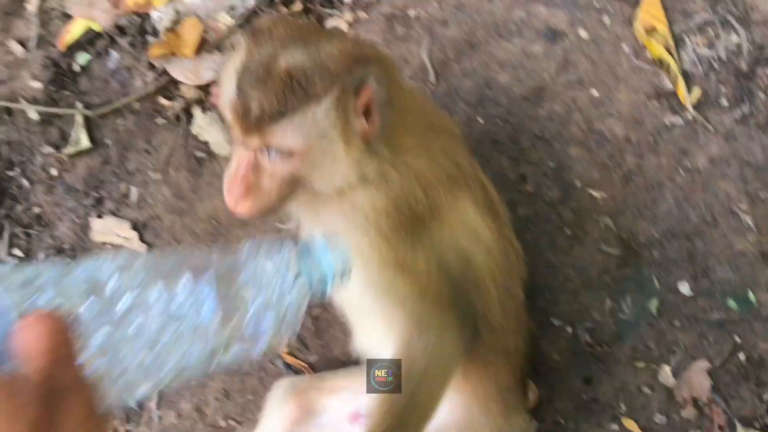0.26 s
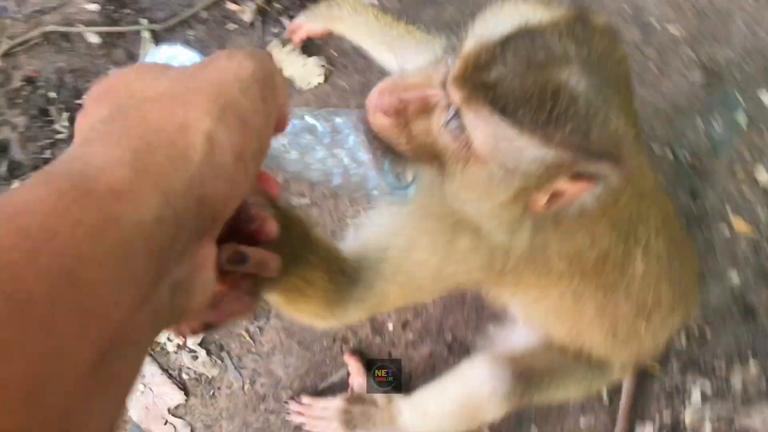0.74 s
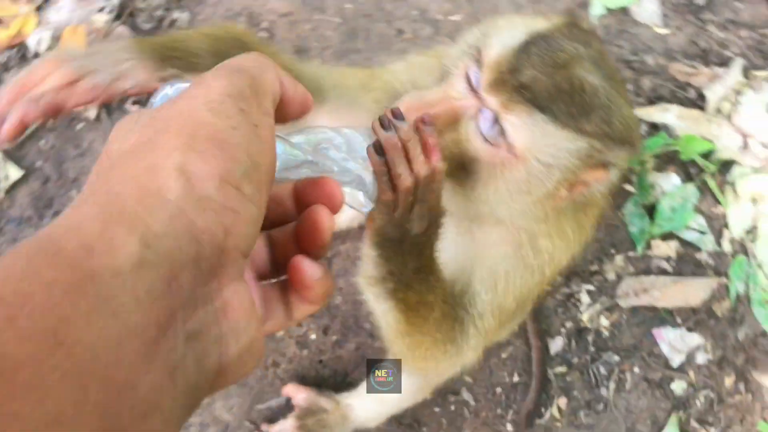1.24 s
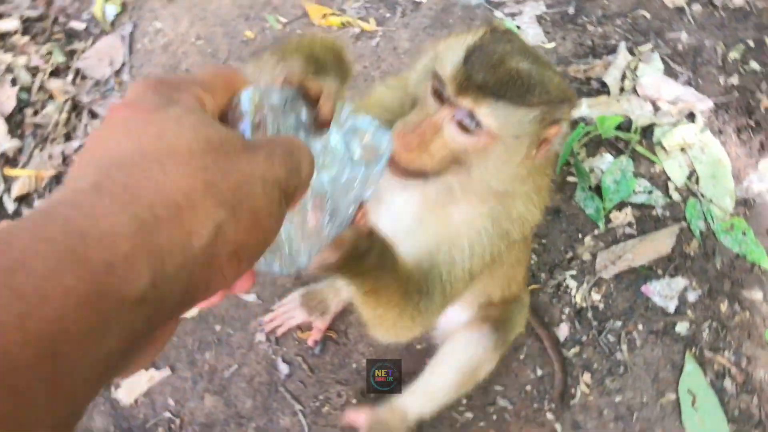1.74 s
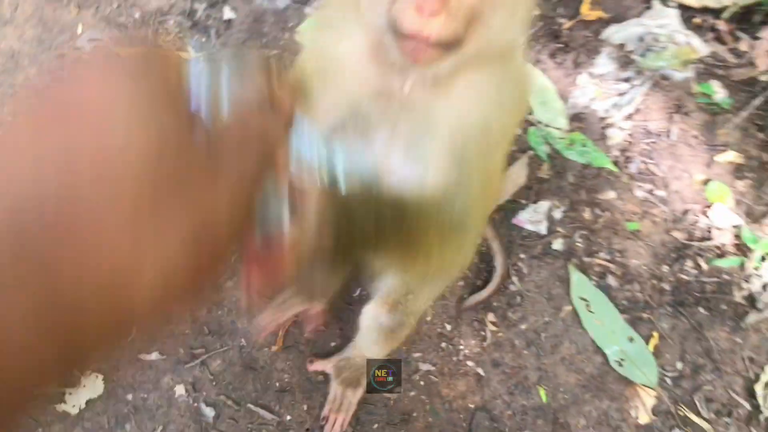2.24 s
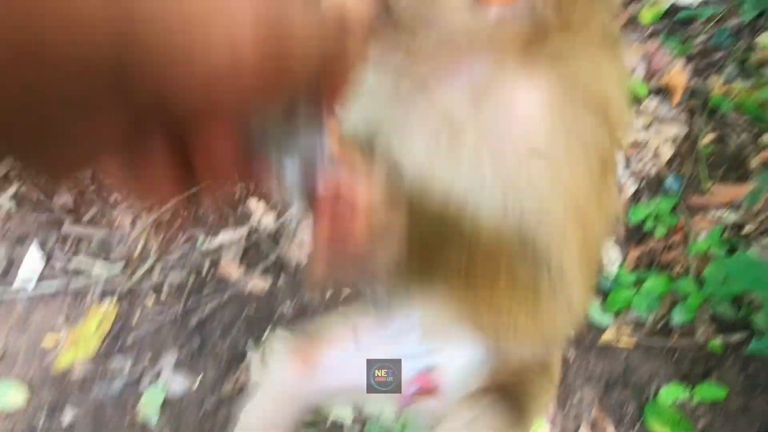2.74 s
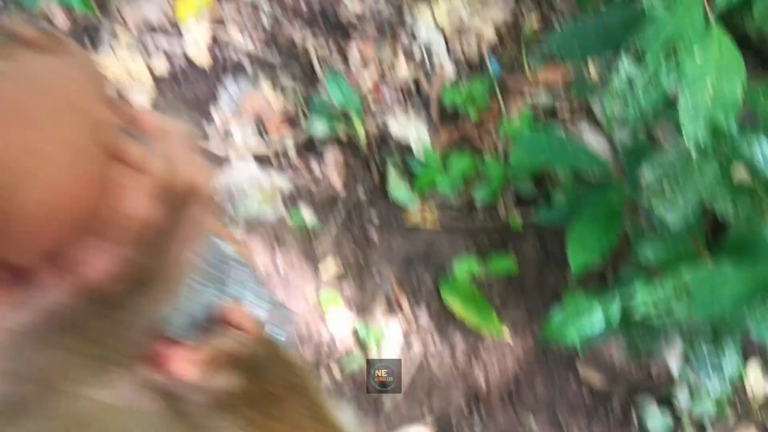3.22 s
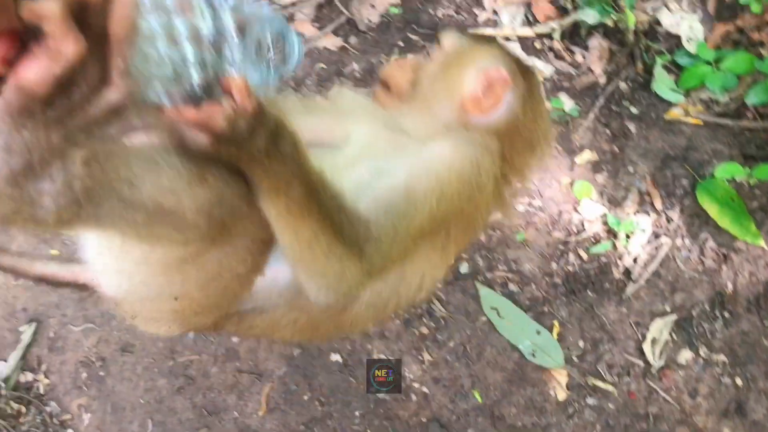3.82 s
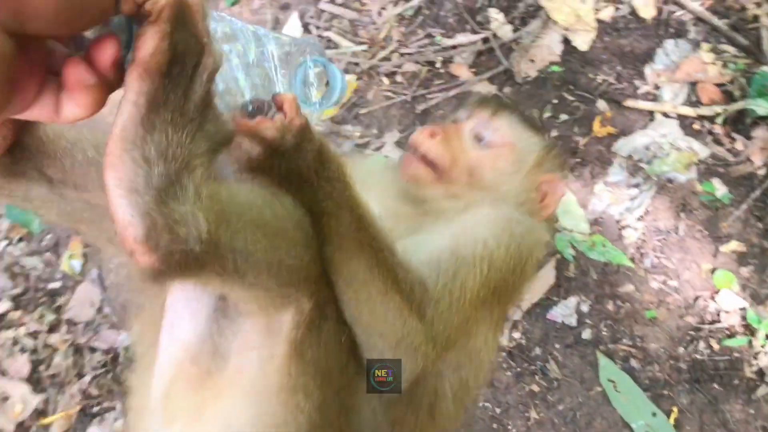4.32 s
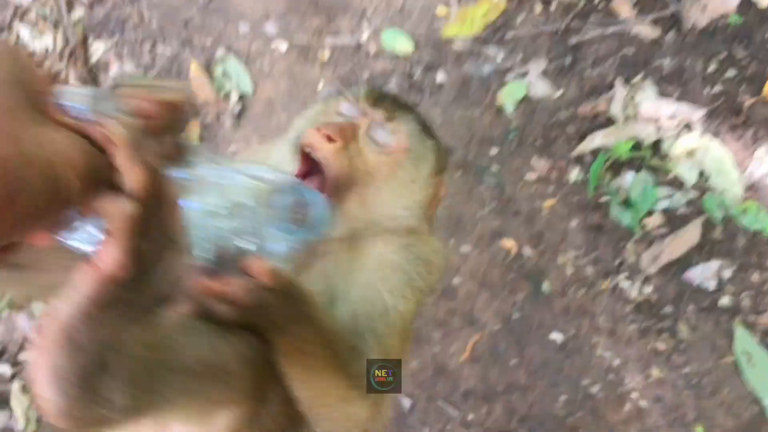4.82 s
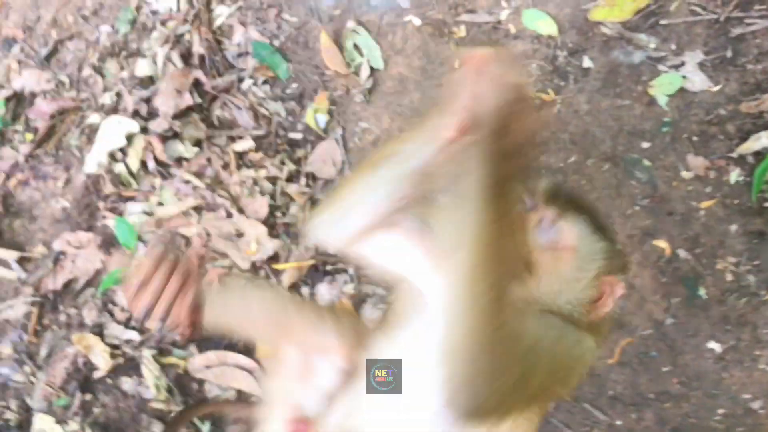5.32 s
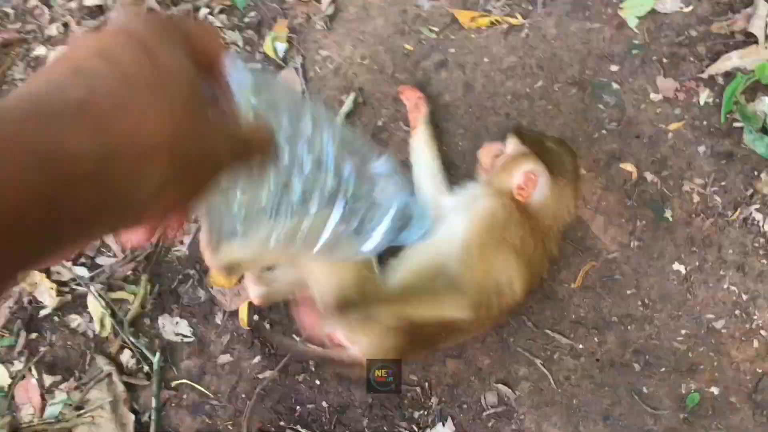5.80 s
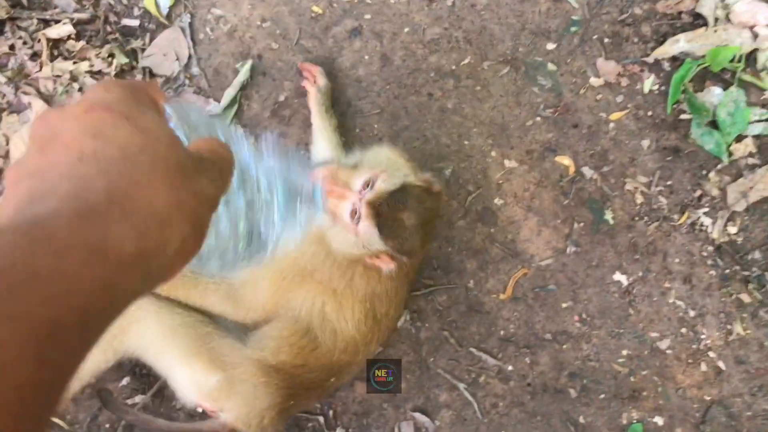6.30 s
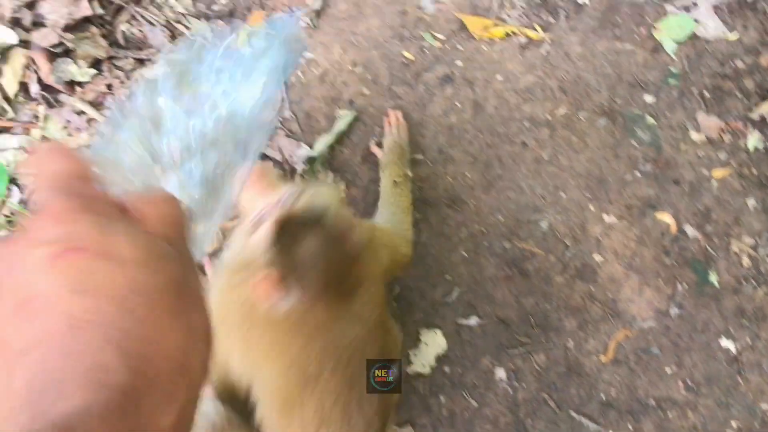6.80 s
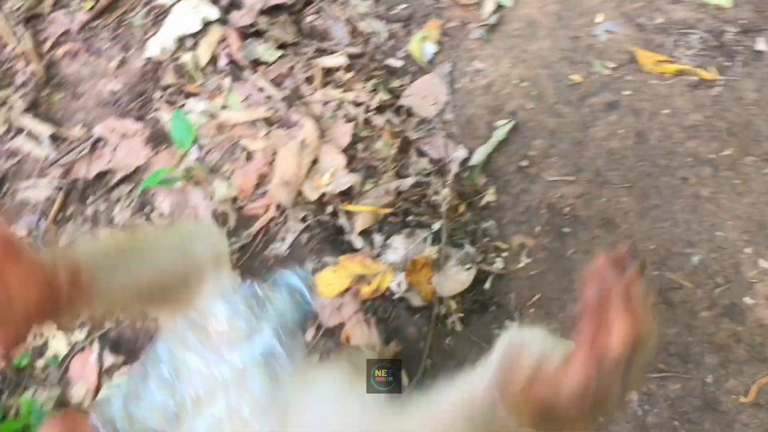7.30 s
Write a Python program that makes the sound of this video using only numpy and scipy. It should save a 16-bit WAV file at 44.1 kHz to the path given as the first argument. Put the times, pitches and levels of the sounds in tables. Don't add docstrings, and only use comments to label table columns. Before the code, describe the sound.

A young monkey grabs and tugs a thin empty plastic bottle, which crackles and snaps sharply close up over faint insects and low wind outdoors.

```python
import sys
import numpy as np
from scipy import signal
from scipy.fft import rfft, irfft, next_fast_len
from scipy.io import wavfile
from scipy.ndimage import uniform_filter1d

SR = 44100
rng = np.random.default_rng(int(sys.argv[2]) if len(sys.argv) > 2 else 0)


def magnitude_from_level(level_db):
    exponent = np.asarray(level_db, float) / 20
    return 10 ** exponent


def dump(signal):
    limited = np.clip(np.atleast_2d(signal).T, -1, 1)
    pcm = np.round(limited * 32767).astype(np.int16)
    wavfile.write(sys.argv[1], SR, pcm)


N = 332955

# time in seconds, wind in dB, insects in dB.
OUTDOORS = [(0.0, -49, -56.5), (0.82, -50, -55), (2.5, -50, -57.5), (3.28, -48.5, -57), (4.48, -48, -54.5),
            (4.94, -48.5, -57.5), (6.94, -46, -54.5), (7.55, -47, -52.5)]
# frequency in Hz, density in dB per Hz.
WIND_SPECTRUM = [(15, 8.5), (25, -14.5), (59, 5), (113, 2), (144, 1.5), (323, -17.5), (447, -29),
                 (1200, -24.5), (1560, -87), (2640, -120)]
INSECT_SPECTRUM = [(5290, -45), (9000, -7), (10300, -17), (12400, 4.5), (13400, 5), (14800, -16),
                   (15700, -25), (16500, -53)]
FAR_HISS_SPECTRUM = [(180, -37.5), (300, -47), (457, -2.5), (1420, 0.5), (8910, -13.5), (10200, -58),
                     (11000, 0.5), (14300, 1.5), (17000, -56)]
FAR_HISS_DB = -59

# time in seconds, leaf rubbing in dB, wall rubbing in dB re leaves.
RUBBING = [(0.0, -58.5, -0.5), (1.0, -58.5, -13), (1.37, -58, 3), (1.6, -52, -10), (2.04, -60.5, -5),
           (2.21, -58.5, -10), (3.2, -59, -24), (4.12, -62.5, -10.5), (4.67, -55.5, -2), (4.93, -59.5, -19),
           (5.17, -52.5, -9), (5.44, -65.5, 2), (5.55, -41, -15), (5.88, -63.5, -1.5), (6.2, -64.5, -4),
           (6.8, -58, -3), (7.28, -63.5, -13), (7.55, -48.5, -3)]
# frequency in Hz, density in dB per Hz.
WALL_SPECTRUM = [(400, -28), (800, 0), (1400, 10), (2400, 4.5), (3500, 4.5), (7000, -10.5)]
LEAF_SPECTRUM = [(1500, -0.5), (2800, 2), (4500, 4.5), (7500, 6.5), (10300, -4), (13000, 9.5), (16500, -14)]
# start and end in seconds, wall rub in dB, bright rustle in dB, resonance in Hz.
SCRAPES = [(0.282, 0.362, -66, -56, 4170), (0.362, 0.383, -53.5, -74, 2010), (0.394, 0.437, -57, -78, 1350),
           (0.528, 0.57, -53, -59, 1850), (0.74, 0.807, -58.5, -53, 6200), (1.178, 1.217, -58, -55, 2700),
           (1.227, 1.271, -54, -70, 2680), (1.343, 1.39, -52, -48, 2800), (1.735, 1.843, -43.5, -46, 6000),
           (2.143, 2.168, -39.5, -33.5, 2320), (2.406, 2.497, -61, -52.5, 2140),
           (2.531, 2.591, -56, -50, 2050), (2.624, 2.67, -58, -56, 2120), (2.737, 2.765, -50, -69, 3060),
           (2.97, 3.005, -58.5, -50.5, 1500), (4.044, 4.146, -86, -61.5, 6700),
           (4.622, 4.667, -49, -47.5, 1410), (5.317, 5.361, -47, -47.5, 2780),
           (5.496, 5.517, -48, -35.5, 2300), (5.502, 5.548, -49, -45.5, 2460),
           (7.475, 7.484, -68, -45.5, 7200), (6.637, 6.658, -49.5, -75, 1280),
           (7.304, 7.385, -59.5, -54.5, 2550), (.09, 0.243, -72, -59, 3400), (1.401, 1.484, -61, -50, 2320),
           (4.2, 4.226, -59, -70, 1790), (4.437, 4.45, -68, -55, 4200), (5.616, 5.67, -67, -65, 4200),
           (5.703, 5.792, -60, -57.5, 5940), (7.38, 7.407, -65, -51, 5030), (1.652, 1.716, -58, -48, 3000)]
SLIPS_PER_S, SLIP_DEPTH = 200, 0.5

# start in seconds, level in dB, main ring in Hz,
# hollow body in dB re level, sharpness in dB re level.
DENTS = [(0.0034, -35.5, 2250, -7.5, -23), (0.413, -43, 1390, -1.5, -28), (0.5332, -32.5, 1350, 5.5, -12),
         (0.9031, -47.5, 1370, 5, 11), (1.7022, -26, 1200, -7.5, -46), (2.0929, -31, 2530, 0, 13.5),
         (2.2161, -43.5, 770, 6.5, -14), (2.6619, -29, 940, -9, -34), (3.0668, -20, 1060, -4.5, -39),
         (3.6628, -25.5, 2140, -15, -25), (3.065, -25, 1120, -6.5, -38), (3.1257, -43, 1490, 6, 13),
         (3.4316, -31.5, 1190, -6, -11), (3.4579, -35.5, 1810, -5, 8), (3.765, -47.5, 1100, 5, -38),
         (4.1912, -35, 1020, -0.5, -14), (4.2751, -33, 1900, -17, -0.5), (4.2824, -39, 970, 3.5, -13),
         (4.9853, -29, 866, 0, -63), (4.9925, -25.5, 950, -15, -54), (5.503, -28.5, 2460, -15, 10.5),
         (6.5105, -34.5, 1200, -6, -2), (6.6444, -41, 1370, -30, -22), (6.7876, -33.5, 1250, -25, -7.5),
         (6.8753, -33.5, 1740, -11, -18), (7.073, -46, 2200, -13, 0), (7.4799, -38.5, 940, -3, -30)]
# start in seconds, level in dB, main ring in Hz,
# hollow body in dB re level, sharpness in dB re level.
CRUSH = [(5.051, -25.5, 1670, -5, -47), (5.055, -37.5, 1340, 15, 15), (5.0667, -28, 1400, -20, -30),
         (5.082, -27.5, 1580, -2, -21), (5.0921, -30.5, 1010, 9.5, 9), (5.0956, -13, 780, -26, -19),
         (5.1073, -24.5, 1580, 1, -5), (5.141, -27, 1610, -11, -12), (5.1828, -43.5, 1480, 2.5, -3),
         (5.2345, -34.5, 1330, 0, -1), (5.2394, -27.5, 1400, -7, 20.5), (5.2559, -20, 1400, -13, 8),
         (5.2613, -14, 1400, -47, -6), (5.2686, -13, 1430, 2, 3.5), (5.2848, -12.5, 1550, -19, -6),
         (5.2949, -16.5, 1610, -4, 6), (5.306, -17, 1570, -9, -38), (5.4988, -33, 4730, -4, 2),
         (5.5137, -35, 2340, -8, 5.5)]
# start in seconds, level in dB, main ring in Hz.
CRINKLES = [(0.013, -38.5, 2660), (0.1294, -44.5, 2360), (.8809, -47, 2900), (1.082, -44.5, 2970),
            (1.186, -48, 2820), (1.476, -34.5, 2580), (1.49, -38.5, 2600), (1.507, -41.5, 2470),
            (1.522, -40, 3760), (1.5345, -45, 3780), (1.5486, -39, 3670), (1.59, -38, 5600),
            (1.6097, -38.5, 5700), (1.628, -41, 2860), (1.6516, -34.5, 2670), (1.6876, -38, 3400),
            (1.7598, -35.5, 2500), (1.8287, -35.5, 2700), (2.8973, -43, 6260), (2.9782, -44, 6100),
            (4.391, -52, 1870), (5.7675, -45.5, 1660), (5.8178, -38, 5900), (6.729, -44.5, 2140),
            (7.3887, -40.5, 3600)]
# start in seconds, peak in dB, main ring in Hz.
STRAYS = [(0.0234, -30, 1410), (0.0364, -31, 1380), (0.0474, -46, 2110), (0.092, -35, 1640),
          (0.2814, -39, 4460), (0.376, -31, 1280), (0.4374, -33, 2580), (0.4686, -38, 1940),
          (0.8654, -45, 1070), (1.1189, -49, 2300), (1.1914, -31, 2520), (1.275, -30, 2130),
          (1.2999, -42, 2920), (1.3239, -32, 2450), (2.5251, -33, 1170), (3.26, -36, 1390),
          (3.2784, -44, 4340), (3.3882, -46, 1390), (3.616, -27.5, 1410), (3.6904, -28, 1460),
          (3.7074, -33, 1460), (3.7236, -31, 1350), (3.7477, -40, 1390), (3.7956, -33, 1500),
          (3.8997, -41, 1280), (3.92, -48, 1450), (4.061, -40, 1400), (4.2214, -43, 2590),
          (4.2453, -46, 1340), (4.2586, -36, 1750), (4.2964, -42, 1560), (4.346, -25.5, 2220),
          (4.496, -34, 1520), (4.8463, -32, 1690), (4.8823, -34, 4270), (5.6276, -26, 3880),
          (5.7384, -32, 1010), (6.0653, -36, 1190), (6.2166, -35, 1220), (6.4278, -40, 1390),
          (6.4982, -39, 1140), (6.5797, -33.5, 2310), (6.626, -40, 1410), (6.911, -39, 1940),
          (7.2389, -43, 2010), (7.2495, -31, 3150), (7.3058, -36, 1480), (7.3585, -29, 1320),
          (7.3922, -30, 1460), (7.419, -36, 5630), (7.444, -35, 1430), (7.5087, -31, 1150)]
# start in seconds, level in dB, main ring in Hz.
PRESSES = [(0.4252, -43, 1310), (3.018, -38, 1470), (3.049, -45, 1150), (3.1081, -30, 1070),
           (3.1961, -40, 1340), (3.6067, -37, 1030), (3.714, -40.5, 1360), (4.34, -43.5, 1480),
           (4.4794, -44, 1350), (5.8254, -40.5, 1110), (5.8947, -42, 1330), (5.947, -51, 1220),
           (5.959, -43, 1270), (6.079, -44, 1220), (6.1197, -44, 1170), (6.23, -45, 1230),
           (6.3793, -39.5, 1280), (6.261, -56, 1180), (6.6556, -35.5, 1210), (6.8017, -36, 1370),
           (6.9472, -38.5, 1260), (7.016, -47, 1400)]
# start in seconds, level in dB,
# main ring in Hz, upper middle in dB re level, sharpness in dB re level.
TIGHT_SNAPS = [(0.9287, -14.5, 2530, -1, -16), (1.894, -16.5, 1690, -5, 6.5), (2.149, -31.5, 2450, -11, 2),
               (2.2509, -32, 2210, -4, 4), (2.7961, -20.5, 1700, 1, 0.5), (2.922, -16.5, 3590, -2, 2),
               (3.0883, -37.5, 5340, 13, -1), (4.433, -24.5, 4250, -5, -6), (4.4655, -23.5, 4130, -8, -8),
               (4.707, -50, 7000, 18, 10), (4.725, -27, 1690, 1, -19)]
# start in seconds, level in dB, main ring in Hz.
WRINGING = [(1.9511, -33.5, 3970), (1.964, -35, 3220), (1.9732, -38.5, 2200), (1.9854, -39, 2110),
            (1.9926, -36.5, 2180), (2.001, -38, 4070), (2.106, -32.5, 2060), (2.131, -34, 3220),
            (2.26, -35.5, 2270), (2.2869, -37.5, 1750), (2.2956, -37, 2290), (2.309, -35.5, 2290),
            (2.3287, -38, 2420), (2.355, -36.5, 2280), (2.3696, -34, 2370), (2.3849, -34.5, 2200),
            (2.416, -36, 2240), (2.4257, -36.5, 3740), (2.445, -36, 6960), (2.4576, -37, 3400),
            (2.4764, -39.5, 1980), (2.4888, -40, 2140), (2.5107, -42, 1270), (2.5606, -42, 2210),
            (2.6235, -31.5, 3700), (2.6822, -36, 2200), (2.7299, -41.5, 3000), (2.762, -45, 2990)]
# start in seconds, level in dB, main ring in Hz,
# upper middle in dB re level, sharpness in dB re level.
SNAPS = [(2.0671, -28, 2480, -5, 6), (2.1554, -26.5, 2630, -12, 9), (2.2256, -21.5, 2060, -5, -6),
         (2.341, -17, 2070, 0, -3), (2.6637, -23, 1980, 3.5, 11.5), (3.1187, -22.5, 1670, 1, 6.5),
         (3.513, -24, 2830, 2.5, -30), (3.6667, -20.5, 1380, 1, 13), (4.5254, -9.5, 7000, -2.5, 2.5),
         (4.613, -27, 4900, 7, 7), (4.691, -17.5, 2450, -6, 3), (4.75, -24, 7150, -1.5, 12),
         (4.8058, -21.5, 1450, 7, 16), (5.1187, -14, 5500, 1.5, 6)]
# start in seconds, level in dB, main ring in Hz.
CREAKS = [(2.628, -44, 2000), (2.6308, -42, 2200), (2.6346, -40, 2100), (2.639, -41, 2000),
          (2.6457, -41, 2000), (2.653, -40, 2000), (2.6568, -44, 2000), (2.6602, -41, 2600),
          (2.6778, -45, 2400), (2.6805, -35, 3000), (2.8006, -37.5, 3000)]
CRINKLE_BODY_DB, CRINKLE_SHARP_DB = -23, 0.5
STRAY_LOSS_DB, STRAY_BODY_DB, STRAY_SHARP_DB = 14.5, -8, -7.5
PRESS_BODY_DB, PRESS_SHARP_DB = -8.5, -11
WRING_BODY_DB, WRING_SHARP_DB = -13, 2
CREAK_BODY_DB, CREAK_SHARP_DB = -20, 3
SNAP_BODY_DB, TIGHT_BODY_DB = -13.5, -22.5
SKIN_PER_SHARP, SKIN_DB_PER_OCTAVE = 0.53, -1.5
CRACK_T60_S, WALL_T60_S, BODY_T60_S = 0.011, 0.019, 0.016
RING_Q, RING_SHARE = 4.5, 0.59
GROUND_LAG_S, GROUND_DB = 0.0043, -11

# start and end in seconds, level in dB, resonance in Hz.
SCUFFS = [(.29, .35, -62, 4200), (.63, 0.743, -61, 1590), (0.944, .97, -59, 2300), (1.35, 1.39, -42, 2700),
          (5.33, 5.34, -35, 2150), (5.323, 5.36, -46, 6000), (5.984, 6.01, -58, 1600),
          (6.04, 6.06, -60, 2300), (6.105, 6.14, -58, 1300), (6.252, 6.285, -56, 1200),
          (6.39, 6.408, -54, 2200), (6.53, 6.56, -57, 1500), (6.656, 6.69, -58, 1400),
          (6.814, 6.84, -55, 1500), (6.9, 6.92, -64, 1820), (4.095, 4.13, -57, 7000),
          (3.437, 3.46, -51, 1300)]
SCUFF_Q = 5.7
# start in seconds, peak in dB, pitch in Hz.
THUMPS = [
    (0.532, -27, 142),
    (0.534, -30, 290),
    (5.054, -24, 280),
    (5.093, -25, 183),
    (4.192, -35, 310),
    (5.299, -30.5, 185),
    (5.5, -34.5, 194),
]
SQUEAK_S, SQUEAK_LENGTH_S, SQUEAK_DB, SQUEAK_HZ = 5.39, 0.03, -51, 1880

DUCK_FROM_DB, DUCK_SHARE, RECOVER_DB_PER_S = -5, 0.66, 7
CUTOFF_HZ = 16800


def rms_one(x):
    return x / np.sqrt(np.mean(x ** 2) + 1e-20)


def in_time(rows):
    s, *columns = np.transpose(rows)
    return [np.interp(np.arange(N) / SR, s, c) for c in columns]


def at_hz(points, hz):
    point_hz, point_db = np.transpose(points)
    return np.interp(np.log(hz), np.log(point_hz), point_db)


def drift(rate_hz):
    r = np.exp(-80 * np.pi * rate_hz / SR)
    noise = rng.standard_normal(N // 40 + 2002)
    slow = signal.lfilter([1], [1, -2 * r, r * r], noise)[2000:]
    return np.interp(np.arange(N) / 40, np.arange(len(slow)), rms_one(slow))


def coloured(x, spectrum):
    size = next_fast_len(N)
    hz = np.arange(size // 2 + 1) * SR / size + 1
    return rms_one(irfft(rfft(x, size) * magnitude_from_level(at_hz(spectrum, hz)), size)[:N])


def resonate(x, hz, width_hz):
    r = np.exp(-np.pi * width_hz / SR)
    poles = [1, -2 * r * np.cos(2 * np.pi * hz / SR), r * r]
    return signal.lfilter(np.array([1, 0, -1]) * (1 - r * r) / 2, poles, x)


def band(x, low_hz, high_hz):
    sos = signal.butter(3, [low_hz, high_hz], "band", fs=SR, output="sos")
    return signal.sosfilt(sos, x + 1e-18)


def grains(per_s, smooth):
    sizes = magnitude_from_level(4 * np.minimum(rng.exponential(1, N), 4)) * rng.choice([-1, 1], N)
    clicks = sizes * (rng.random(N) < per_s / SR)
    return rms_one(clicks) + smooth * rng.standard_normal(N)


def patchy(x, spread_db):
    edges_hz = [100, 1200, 2200, 3600, 5600, 8500, 17000]
    bands = (magnitude_from_level(spread_db * drift(3.1)) * band(x, low, high) for low, high in zip(edges_hz, edges_hz[1:]))
    return rms_one(sum(bands))


def outdoors():
    wind_db, insects_db = in_time(OUTDOORS)
    wind = magnitude_from_level(wind_db + 2.0 * drift(2.5)) * coloured(rng.standard_normal(N), WIND_SPECTRUM)
    chirp_db = 1.8 * drift(29) + 0.52 * drift(170)
    insects = magnitude_from_level(insects_db + chirp_db) * coloured(rng.standard_normal(N), INSECT_SPECTRUM)
    far_hiss = magnitude_from_level(FAR_HISS_DB) * coloured(rng.standard_normal(N), FAR_HISS_SPECTRUM)
    return wind + insects + far_hiss


def scrapes():
    out = np.zeros(N)
    fine_wall = coloured(grains(4000, smooth=1.0), WALL_SPECTRUM)
    fine_leaves = coloured(grains(4000, smooth=1.0), LEAF_SPECTRUM)
    slip = np.cumsum(SLIPS_PER_S * magnitude_from_level(3 * drift(30)) / SR) % 1
    for start, end, rub_db, rustle_db, hz in SCRAPES:
        at = slice(round(start * SR), min(round((end + 0.02) * SR), N))
        age, length = np.arange(at.stop - at.start) / SR, end - start
        grip = np.interp(age, [0, 0.21 * length, 0.96 * length, length + 0.015], [0, 1, 1, 0])
        grip = grip * (1 + SLIP_DEPTH * (1 - 2 * slip[at]))
        slide = magnitude_from_level(rub_db) * fine_wall[at] + magnitude_from_level(rustle_db) * fine_leaves[at]
        out[at] += grip * (slide + 1.84 * resonate(slide, hz, hz / 4.6))
    return out


def rubbing():
    leaves_db, share_db = in_time(RUBBING)
    clumps = drift(30)
    wall = coloured(grains(500 * magnitude_from_level(6.0 * clumps), smooth=1.0), WALL_SPECTRUM)
    leaves = coloured(grains(900 * magnitude_from_level(3.5 * clumps), smooth=0.97), LEAF_SPECTRUM)
    wall = magnitude_from_level(leaves_db + share_db) * patchy(wall, spread_db=-1.5)
    leaves = magnitude_from_level(leaves_db) * patchy(leaves, spread_db=2.75)
    return magnitude_from_level(1.4 * clumps) * (wall + leaves)


def folds():
    rows = (DENTS + CRUSH
            + [(*r, CREAK_BODY_DB, CREAK_SHARP_DB) for r in CREAKS]
            + [(*r, WRING_BODY_DB, WRING_SHARP_DB) for r in WRINGING]
            + [(*r, CRINKLE_BODY_DB, CRINKLE_SHARP_DB) for r in CRINKLES]
            + [(s, db - STRAY_LOSS_DB, hz, STRAY_BODY_DB, STRAY_SHARP_DB) for s, db, hz in STRAYS]
            + [(*r, PRESS_BODY_DB, PRESS_SHARP_DB) for r in PRESSES])
    out = [(*r[:3], SNAP_BODY_DB, *r[3:]) for r in SNAPS]
    out += [(*r[:3], TIGHT_BODY_DB, *r[3:]) for r in TIGHT_SNAPS]
    for s, db, hz, body_db, sharp_db in rows:
        skin_db = SKIN_PER_SHARP * sharp_db + SKIN_DB_PER_OCTAVE * np.log2(hz / 2000)
        out.append((s, db, hz, body_db, skin_db, sharp_db))
    return out


def snaps():
    t = np.arange(SR // 16) / SR
    body, wall, skin, edge, rings = np.zeros((5, N + len(t)))
    for s, level_db, main_hz, body_db, skin_db, sharp_db in folds():
        noise = rng.standard_normal((5, len(t)))
        start = round(s * SR)
        at, step = slice(start, start + len(t)), start + 2
        size = magnitude_from_level(0.07 * (level_db + 20))
        crack = magnitude_from_level(-60 * t / (CRACK_T60_S * size))
        shake = crack + 0.42 * magnitude_from_level(-60 * t / (WALL_T60_S * size))
        edge_fade = crack ** 1.6 + 0.073 * magnitude_from_level(-60 * t / (0.075 * size))
        ring = resonate((t == 0) * 7.9 + noise[0] * crack, main_hz, main_hz / RING_Q)
        ring_db = level_db + (skin_db if main_hz > 2700 else 0)
        rings[at] += magnitude_from_level(ring_db + 13.0) * RING_SHARE * ring / np.abs(ring).max()
        wall[at] += magnitude_from_level(level_db + 9.5) * noise[1] * (shake - 0.4 * crack)
        skin[at] += magnitude_from_level(level_db + skin_db + 5.5) * noise[4] * shake
        edge[at] += magnitude_from_level(level_db + sharp_db + 1.0) * noise[2] * edge_fade
        edge[step] += magnitude_from_level(level_db + sharp_db + 8.5)
        skin[step] += magnitude_from_level(level_db + skin_db + 12)
        wall[step] += magnitude_from_level(level_db + 14.5)
        swell = 1 - np.exp(-t / 0.0021)
        body[at] += magnitude_from_level(level_db + body_db + 23.5) * noise[3] * swell * magnitude_from_level(-60 * t / BODY_T60_S)
    low = band(body, 430, 1320) + band(wall, 1230, 2716)
    high = band(skin, 2860, 6610) + band(edge, 6800, 14060)
    return (low + high + rings)[:N]


def surroundings(x):
    t = np.arange(SR // 5) / SR
    scatter = signal.lfilter([0.4], [1, -0.6], rng.standard_normal(len(t)))
    scatter = scatter * magnitude_from_level(-60 * t / 0.15) * (t > 0.004)
    ground = rng.standard_normal(len(t)) * magnitude_from_level(-60 * (t - GROUND_LAG_S) / 0.004) * (t > GROUND_LAG_S)
    paths = magnitude_from_level(GROUND_DB) * ground / np.sqrt(np.sum(ground ** 2)) + magnitude_from_level(-45.5) * scatter
    return signal.fftconvolve(x, paths)[:N]


def scuffs():
    out, grain = np.zeros(N), grains(3000, smooth=1.0)
    for start, end, level_db, hz in SCUFFS:
        at = slice(round(start * SR), round(end * SR))
        tone = resonate(resonate(grain[at], hz, hz / SCUFF_Q), hz, hz / 2)
        out[at] += magnitude_from_level(level_db) * np.sqrt(np.hanning(len(tone))) * rms_one(tone)
    return out


def thumps():
    out, t = np.zeros(N), np.arange(SR // 10) / SR
    for s, peak_db, hz in THUMPS:
        onset = 1 - np.exp(-t / 0.00065)
        out[round(s * SR):][:len(t)] += magnitude_from_level(peak_db - 60 * t / 0.067) * np.sin(2 * np.pi * hz * t) * onset
    return out


def squeak():
    t = np.arange(N) / SR
    age = np.clip((t - SQUEAK_S) / SQUEAK_LENGTH_S, 0, 1)
    return magnitude_from_level(SQUEAK_DB) * np.sin(np.pi * age) * np.sin(2 * np.pi * SQUEAK_HZ * t)


def scene():
    bed = outdoors() + rubbing() + scrapes()
    bottle = snaps() + thumps() + squeak()
    return (bed + bottle + surroundings(bottle) + scuffs())[None]


def roll_off(x):
    return signal.sosfilt(signal.butter(12, 17000, fs=SR, output="sos"), x)


def record(dry):
    climb_db = RECOVER_DB_PER_S * np.arange(N) / SR
    level_db = 10 * np.log10(uniform_filter1d(dry[0] ** 2, size=441, origin=220) + 1e-12)
    cut_db = DUCK_SHARE * np.maximum(level_db - DUCK_FROM_DB, 0)
    held_db = np.maximum.accumulate(cut_db + climb_db) - climb_db
    x = dry * magnitude_from_level(-signal.lfilter([0.004], [1, -0.996], held_db))
    x = x + 0.13 * resonate(x, 15000, 2000)
    x = 0.7 * np.tanh(x / 0.7)
    x = signal.sosfilt(signal.butter(2, 38, "high", fs=SR, output="sos"), x)
    x = signal.sosfilt(signal.cheby2(10, 60, CUTOFF_HZ + 400, fs=SR, output="sos"), x)
    return roll_off(x)


dry = scene()
out = record(dry)
dump(out)
```